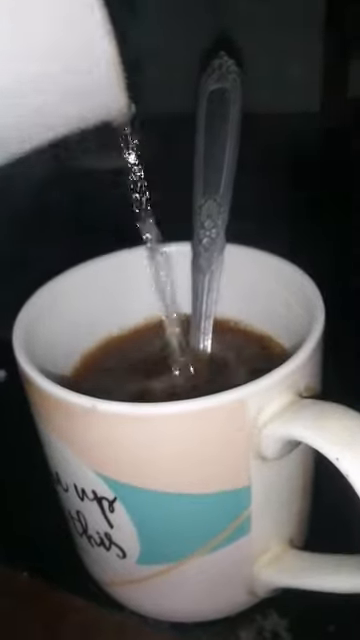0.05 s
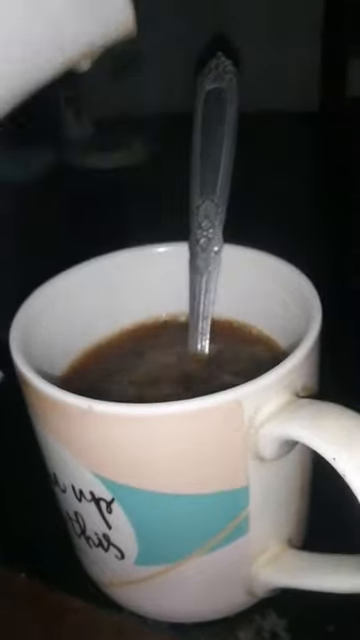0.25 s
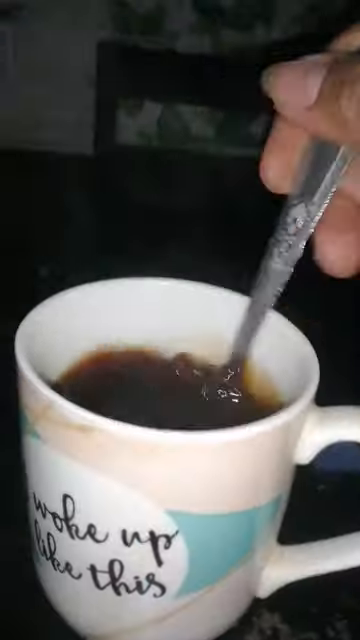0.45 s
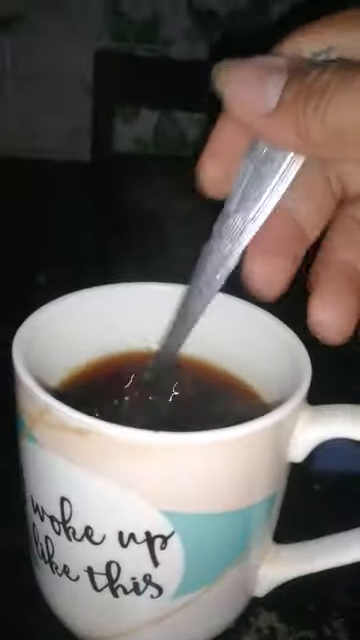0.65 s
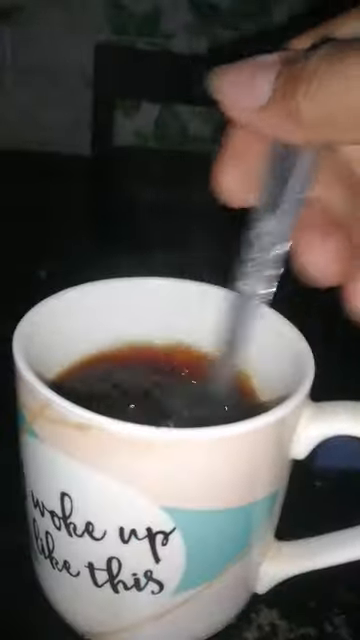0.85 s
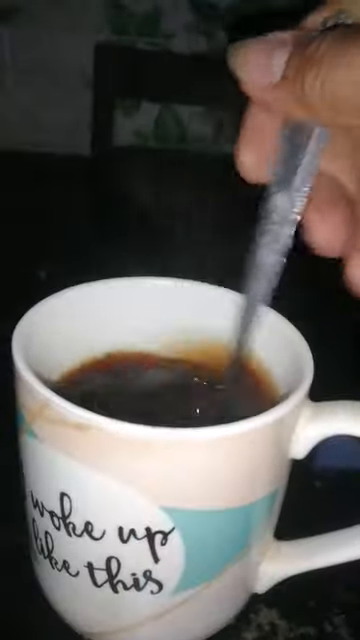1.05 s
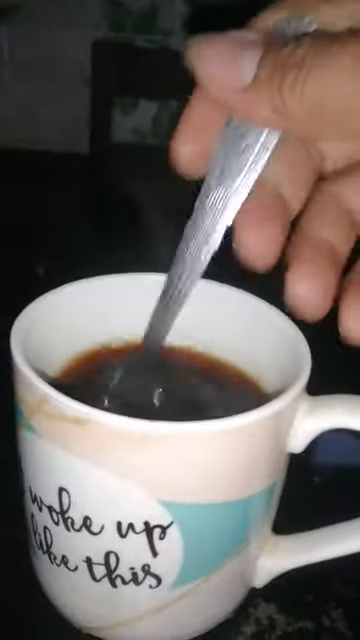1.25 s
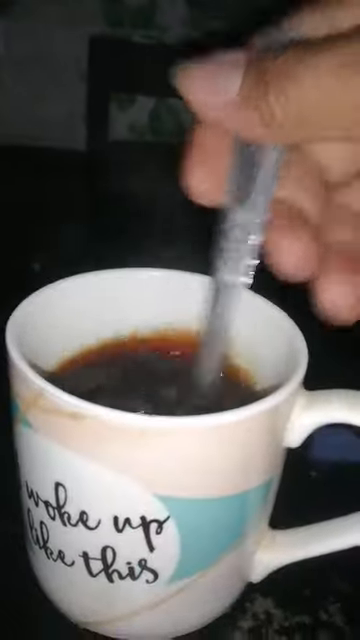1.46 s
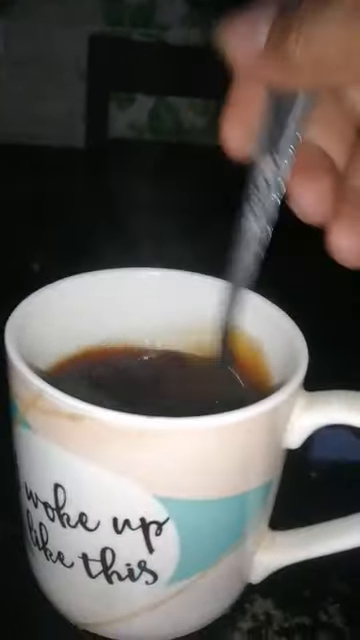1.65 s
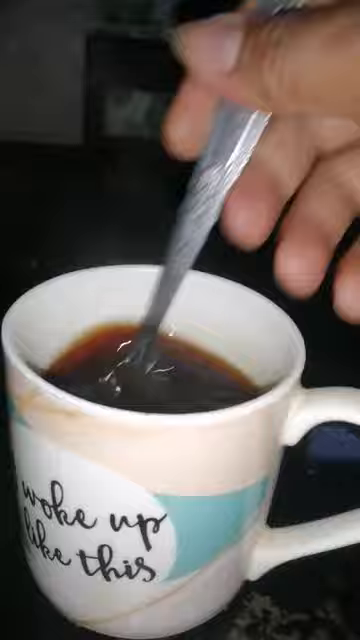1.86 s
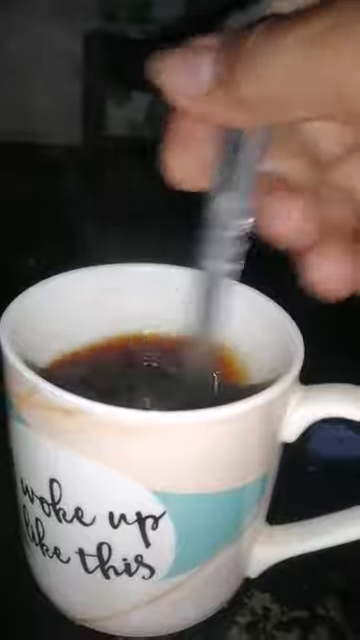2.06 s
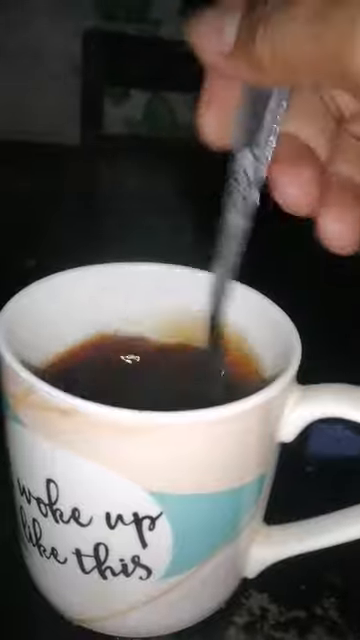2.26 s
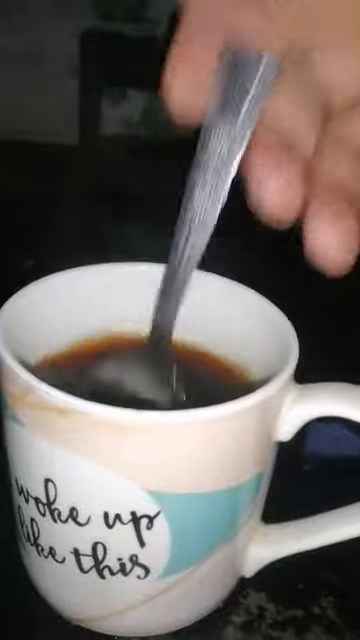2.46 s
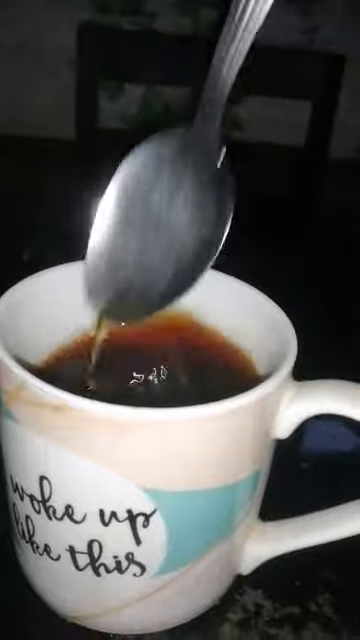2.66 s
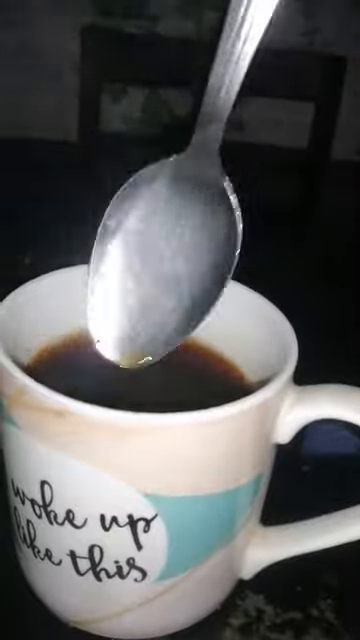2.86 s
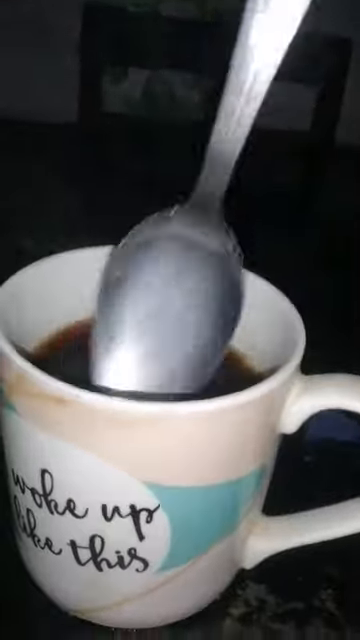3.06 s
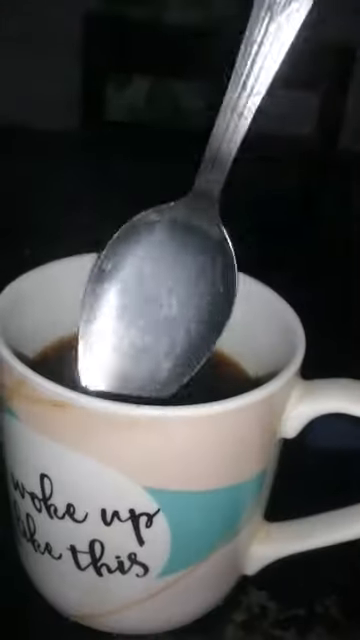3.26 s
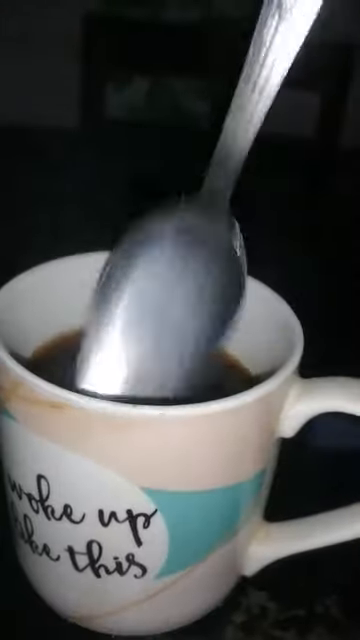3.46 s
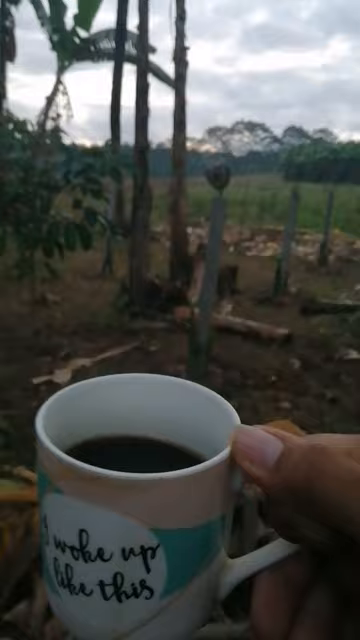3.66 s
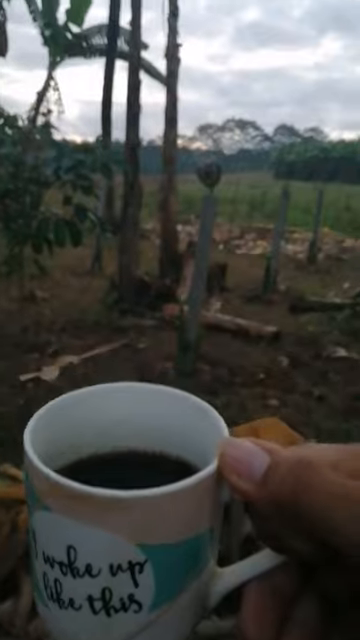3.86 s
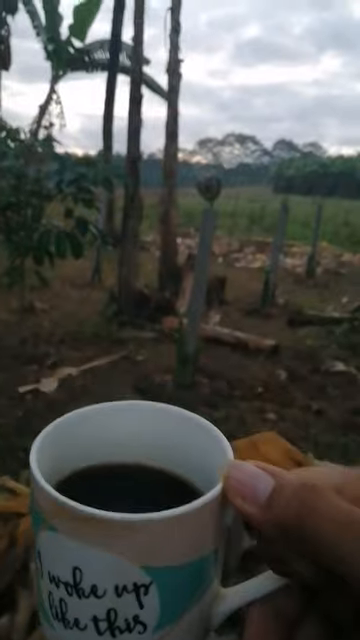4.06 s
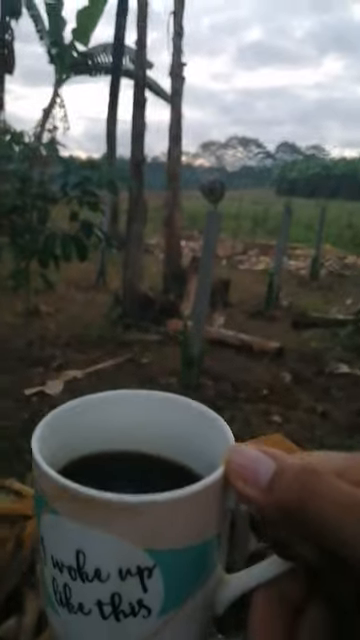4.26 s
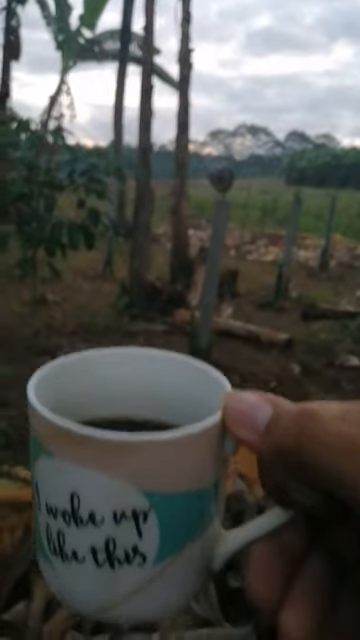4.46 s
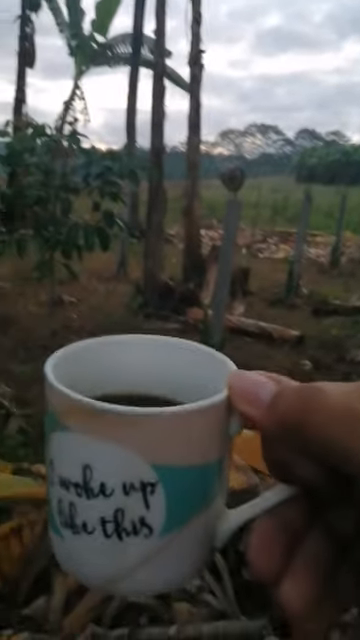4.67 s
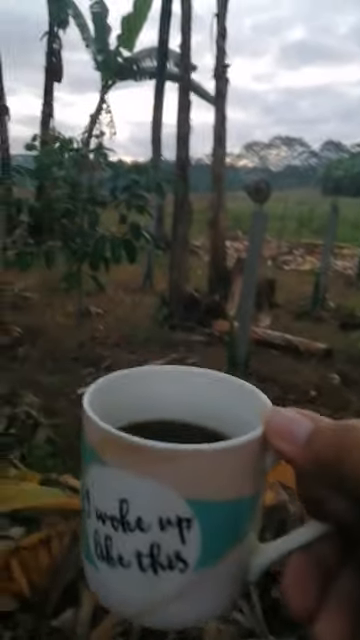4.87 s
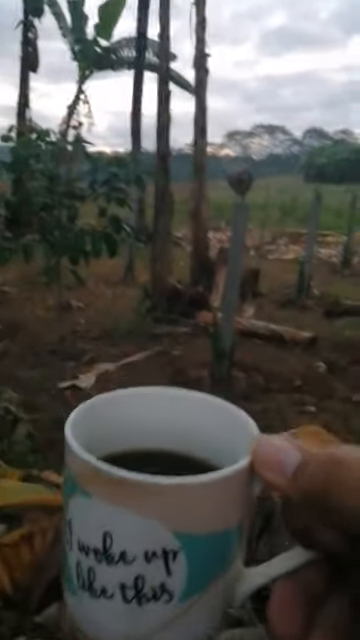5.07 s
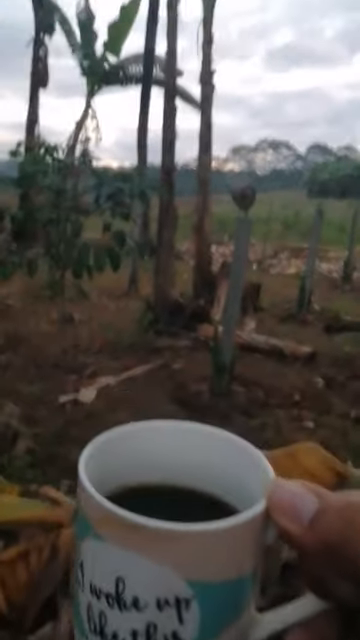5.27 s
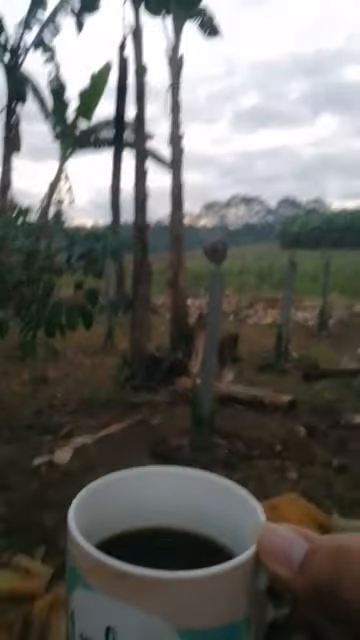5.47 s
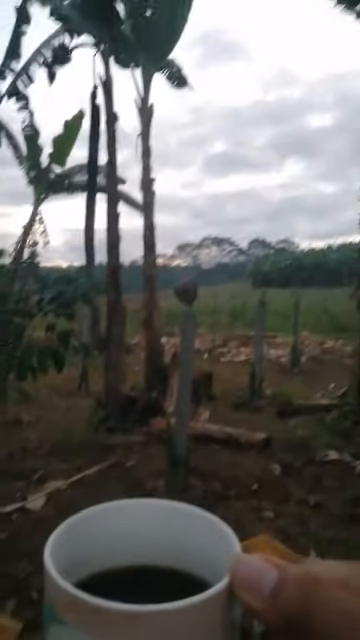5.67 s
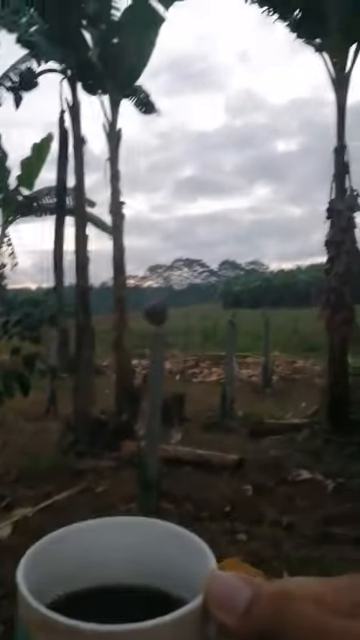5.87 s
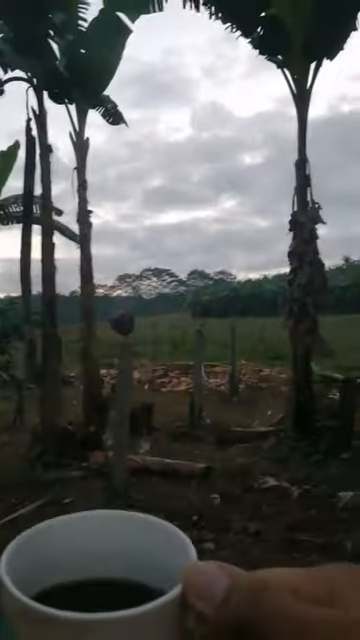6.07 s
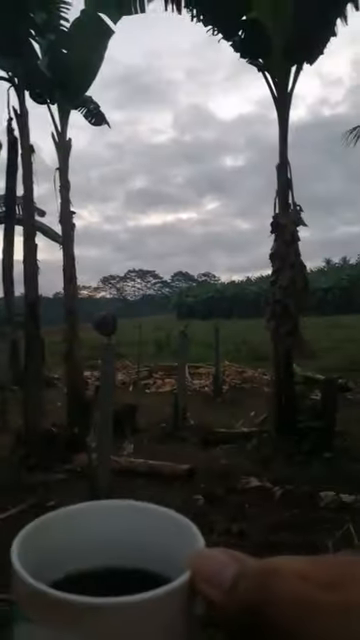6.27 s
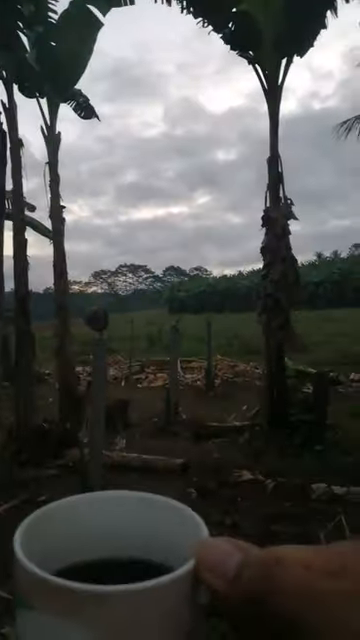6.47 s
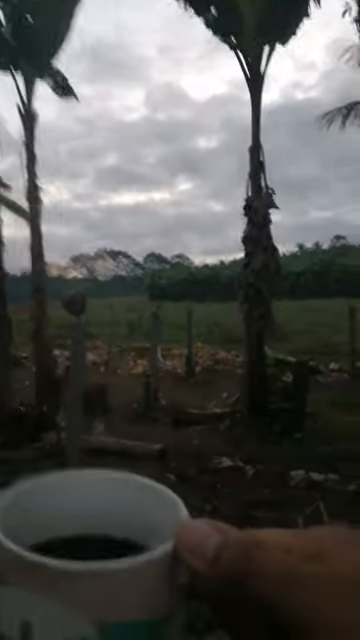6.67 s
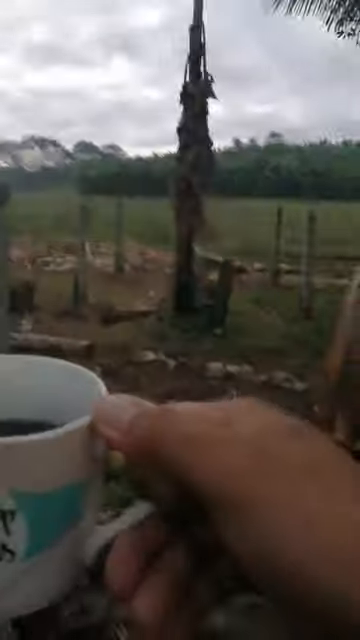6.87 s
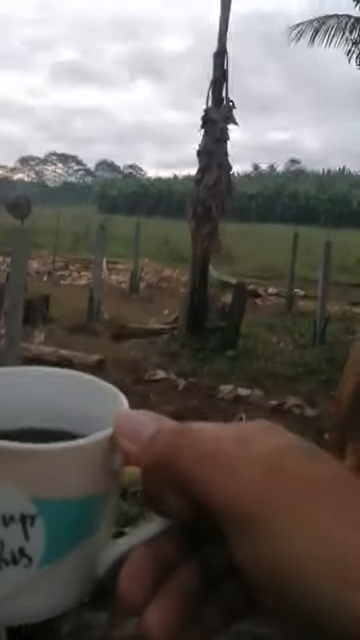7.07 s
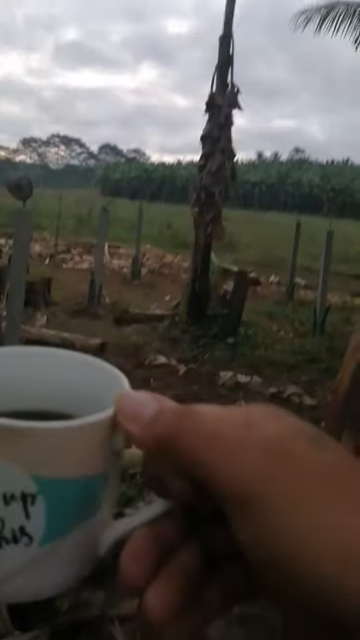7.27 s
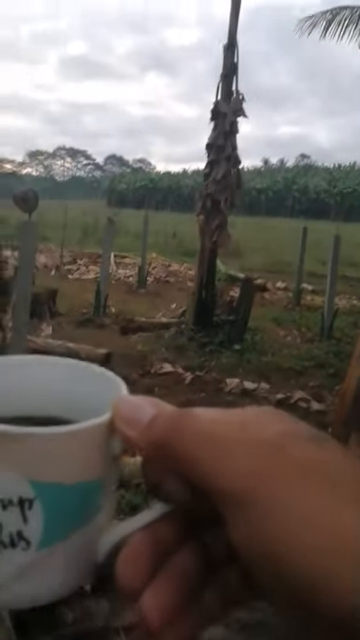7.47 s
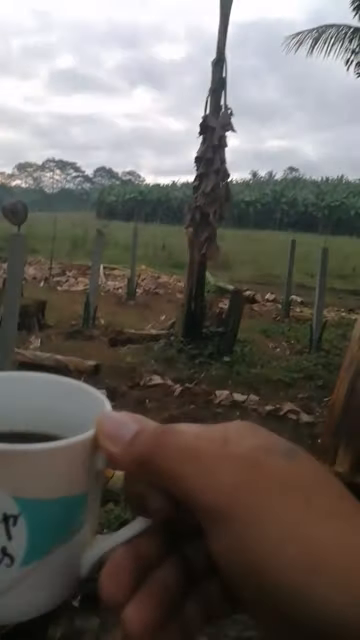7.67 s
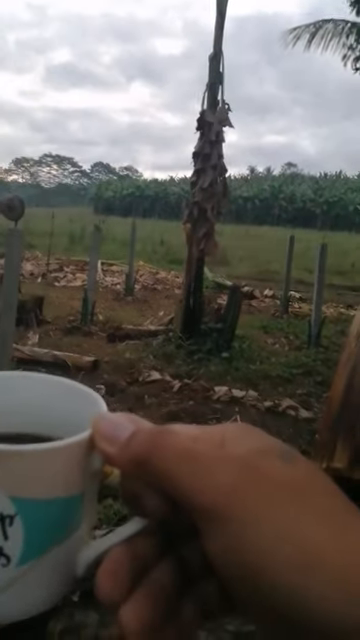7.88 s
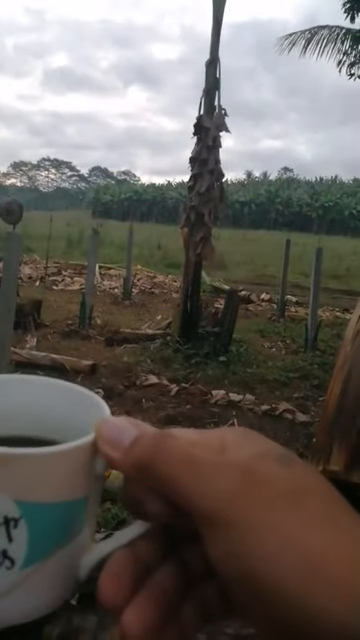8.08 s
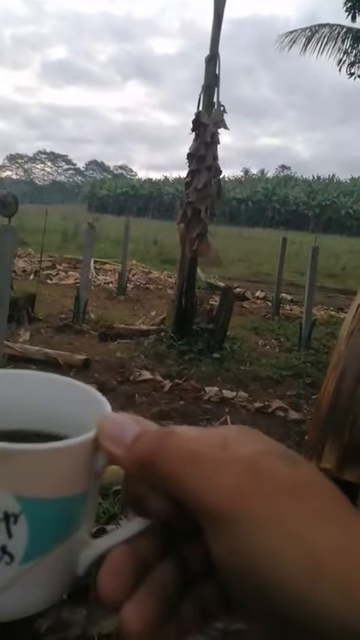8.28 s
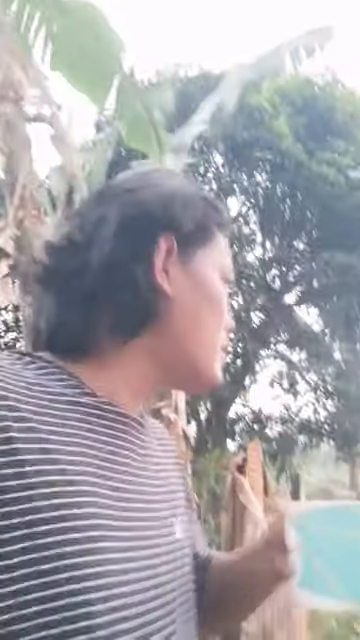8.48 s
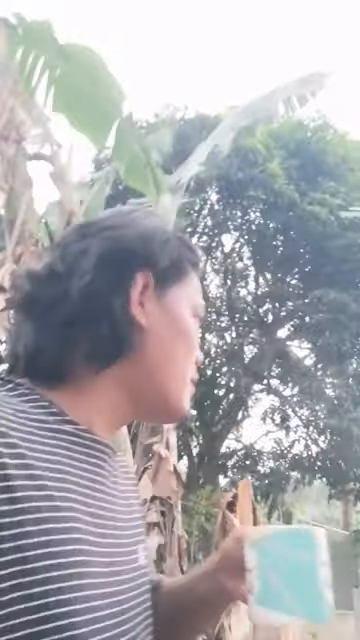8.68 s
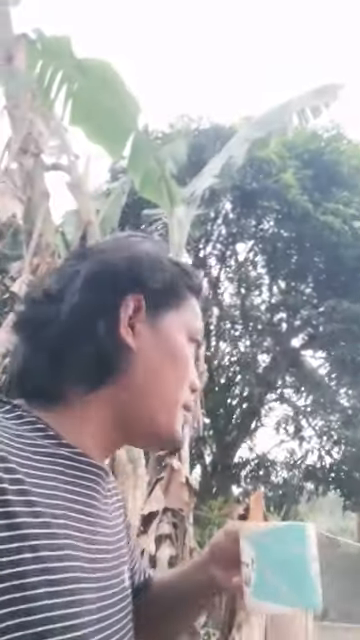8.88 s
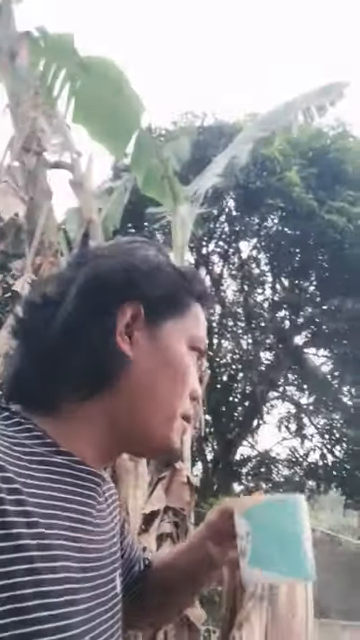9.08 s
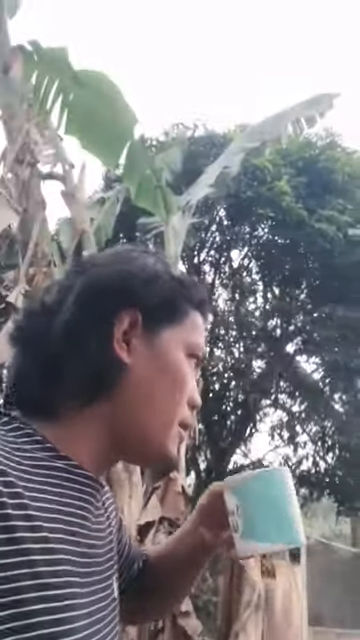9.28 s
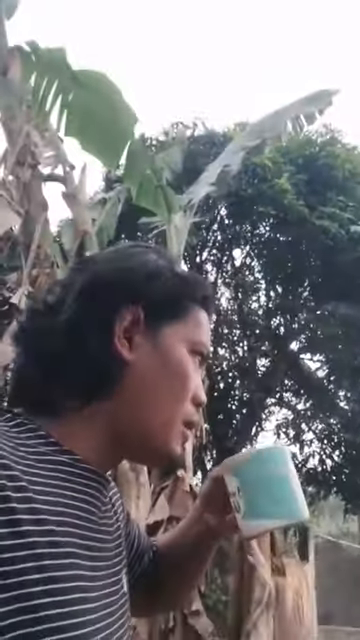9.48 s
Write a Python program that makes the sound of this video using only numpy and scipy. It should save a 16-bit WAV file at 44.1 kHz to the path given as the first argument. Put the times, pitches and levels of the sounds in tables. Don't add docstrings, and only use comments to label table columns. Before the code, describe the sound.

From 0 to 0.45 s, a few faint bubbly drops fall into a mug over quiet room air, a low motor hum and a thin pulsing cricket. A cut at 0.47 s starts close spoon stirring: light touches, then irregular damped ceramic clinks with small rebounds and gritty scrapes, busiest from 0.75 to 2.3 s, with a faint last touch near 2.6 s. Three loud, hard, bright rim raps follow at 2.9, 3.1 and 3.45 s, ringing briefly in the small room. At 3.7 s it cuts to open fields: steady high insect hiss, soft handling bumps, leaves gusting around 5.0-5.5 s, a sharp close tick at 5.6 s, extremely faint distant fowl, and a rooster from about 8.0 s. At 8.5 s another cut brings a small puttering engine, swelling until 9.6 s, while a field cricket gives triple chirps about every quarter second.

```python
import sys
import numpy as np
from scipy import signal
from scipy.fft import rfft, irfft, next_fast_len
from scipy.io import wavfile
from scipy.ndimage import uniform_filter1d

SR = 44100
rng = np.random.default_rng(int(sys.argv[2]) if len(sys.argv) > 2 else 0)


def transcribe(signal):
    frames = np.atleast_2d(signal).T
    limited = np.clip(frames, -1, 1)
    pcm = np.round(limited * 32767).astype(np.int16)
    wavfile.write(sys.argv[1], SR, pcm)


def magnitude_from_level(level_db):
    exponent = np.asarray(level_db, float) / 20
    return 10 ** exponent


N = 420713
T = np.arange(N) / SR

# (start [s], end [s])
SHOTS = [
    (0, .441),
    (.468, 3.668),
    (3.697, 8.451),
    (8.479, 9.6),
]
# (frequency [Hz], level [dB], t60 [s])
WET_MODES = [(308, -30, 0.071), (776.6, -21.5, 0.063), (1376, 0.5, 0.046), (1750, 2.5, 0.024),
             (1937, -1.5, 0.15), (2067, 3.5, 0.071), (2250, 1.5, 0.034), (2430, 4.5, 0.085),
             (2903, -21.5, 0.11), (965, -17.5, 0.0096), (574, -24.5, 0.024), (3400, -19, 0.056),
             (3870, -12, 0.041), (4220, -10.5, 0.035), (4980, -12, 0.044), (5460, -6.5, 0.038),
             (5460, -13, 0.033), (5770, -3, 0.023), (7030, -15.5, 0.051), (8040, -18, 0.037),
             (11050, -24.5, 0.059)]


def colour(x, table):
    hz, db = np.transpose(table)
    size = next_fast_len(x.shape[-1])
    f = np.maximum(np.arange(size // 2 + 1) * SR / size, 1)
    gain = magnitude_from_level(np.interp(np.log(f), np.log(hz), db))
    return irfft(rfft(x, size) * gain, size)[..., :x.shape[-1]]


def level(x, db):
    return x * magnitude_from_level(db) / np.sqrt(np.mean(x ** 2))


def walk(rate, size):
    k = int(SR / rate)
    held = np.repeat(rng.standard_normal(size // k + 1), k)
    return 1.85 * uniform_filter1d(uniform_filter1d(held, k), k)[:size]


def add(out, s, x):
    i = max(int(s * SR), 0)
    out[..., i:i + x.shape[-1]] += x[..., :max(N - i, 0)]


def sides(pan_db):
    return magnitude_from_level(np.array([[pan_db], [-pan_db]]) / 2)


def spoon_in_mug():
    out = rubbing() + stirring() + rapping()
    t = np.arange(int(.3 * SR)) / SR
    decay = np.exp(-np.log(1000) * t / 0.25) * (t > .006)
    tail = colour(rng.standard_normal((2, len(t))) * decay,
                  [(100, 10.0), (400, 7.0), (1200, 3.0), (3200, 2.0), (5500, -6.0), (9000, -4.0),
                   (11600, -4.5), (12300, -14), (13300, -6.5), (15000, -7.5)])
    return out + signal.fftconvolve(out, magnitude_from_level(-42.5) * tail, axes=1)[:, :N]


def stirring():
    # (time [s], peak level [dB], wall ring [dB], brightness [dB], wall note [Hz])
    blows = [(0.4848, -38.5, 2.5, -16.5, 2110), (0.607, -32.5, -16, -30, 2060),
             (0.6598, -27, -18, -13, 2025), (0.753, -14, -4.5, -11, 1917), (0.803, -16, -10, -17.5, 2090),
             (0.9975, -33, -5, -12, 2300), (1.036, -19.5, -3, -17.5, 1997), (1.1774, -14, -16, -13, 2180),
             (1.3422, -22, -9.5, -17.5, 2066), (1.491, -18.5, -10.5, -6, 2120),
             (1.6446, -16.5, -2, -14, 1860), (1.6655, -12, -11, -15, 2020),
             (1.7576, -9, -18.5, -13.5, 2105), (1.8997, -23, -16.5, -13.5, 2420),
             (1.9868, -11.5, -8.5, -17, 2094), (2.0585, -9, -21, -9, 2160),
             (2.2255, -21.5, -7.5, -13.5, 2250), (2.6231, -41.5, -8, -8, 2400)]
    blow_free = [0.76, 0.92, 1.2, 0.97, 1.06, 1.1, 0.8, 1, 1, .9, .9, 1.08, 1.35, 1.5, 1.4, 1.12, 0.92, 1]
    # (time [s], peak level [dB], wall ring [dB])
    rebounds = [(.5412, -52, -3), (.6414, -51, -15), (.8969, -40, -8), (1.186, -32.5, -1),
                (1.2157, -42.5, -25), (1.301, -45.5, -18), (1.583, -45, -9), (1.601, -44.5, -10),
                (2.1667, -49.5, -29), (2.3124, -50, -23), (0.7797, -48, 3), (1.066, -27.5, -1),
                (1.0752, -27.5, -2), (1.0854, -26, -3), (1.0924, -23, -3), (1.3642, -26.5, -23),
                (1.376, -22.5, -21), (1.3915, -21, -16), (1.5113, -27, -10), (1.6808, -26.5, -17),
                (1.765, -32.5, -14), (1.7845, -23.5, -37), (2.0674, -27, -3), (2.078, -26, -26),
                (2.2547, -35, -15), (2.229, -24.5, -16), (1.7705, -27, -17), (1.672, -27, -15),
                (.808, -24, -10)]
    out, wet = np.zeros((2, N)), np.array(WET_MODES) + [0, -13, 0]
    hits = [(*row, 3.5, .0013, free) for row, free in zip(blows, blow_free)]
    for s, db, ring_db in rebounds:
        note_hz = [row[-1] for row in blows if row[0] < s][-1]
        hits.append((s, db, ring_db, -20, note_hz, 5, .0024, .9))
    for s, db, ring_db, bright_db, note_hz, pan_db, crack_s, free in sorted(hits):
        hit = clink(wet * [1, 1, free], ring_db + 6.0, bright_db + 9.0, note_hz, crack_s, bounce_s=0.0049,
                    bounce_db=-12.5, scatter_db=2.2, rough_db=4.0, rise_s=0.0012, size=5000)
        add(out, s, magnitude_from_level(db + 3.5) * sides(pan_db) * hit)
    return out


def rapping():
    # (time [s], peak level [dB], wall ring [dB], brightness [dB], low thud [dB])
    raps = [
        (2.9251, 2, -22.5, -8, 0.5),
        (3.0747, -2, -33, -11.5, -0.5),
        (3.46, -1, -19.5, -9, 0.5),
    ]
    # (frequency [Hz], level [dB], t60 [s])
    rim_modes = [(640, -21, .05), (760, -22, .07), (1942, -8, .1), (2000, -13, .1), (2088, -1, .2),
                 (4247, -21, .13), (4520, -8, .035), (4830, -9, .05), (5160, -25, .12), (5464, -21, .16),
                 (5620, -25, .12), (5768, -23, .16), (5860, -23, .15), (6920, -25, .07)]
    # (frequency [Hz], level [dB], t60 [s])
    spoon_modes = [(7311, -29, .11), (7900, -27, .16), (8300, -28, .13), (9300, -29, .14), (9890, -27, .17),
                   (10310, -29, .11), (11425, -6, .135), (13090, -31, .13), (13320, -28, .16),
                   (13440, -30, .13), (13880, -35, .15), (14480, -24, .13), (14800, -31, .14),
                   (15120, -35, .13)]
    bowl_ring = [-5.5, 5, -6]
    grip_tuning = [.9965, .9995, 1.0015]
    rap_free = [1.05, .9, 0.92]
    out, rim = np.zeros((2, N)), np.array(rim_modes + spoon_modes) + [0, -9, 0]
    bowl = np.outer(np.abs(rim[:, 0] - 11400) < 300, [0, 1, 0])
    for row, sing_db, tuning, free in zip(raps, bowl_ring, grip_tuning, rap_free):
        s, db, ring_db, bright_db, thud_db = row
        modes = (rim + sing_db * bowl) * [tuning, 1, free]
        rap = clink(modes, ring_db + 10.0, bright_db + 10, 2089, crack_s=0.0023, bounce_s=.0033,
                    bounce_db=-2.1, scatter_db=1.5, rough_db=2.6, rise_s=0.00068, size=12000,
                    thud_db=thud_db)
        add(out, s, magnitude_from_level(db + 4.0) * sides(4.4) * rap)
    return out


def rubbing():
    # (from [s], to [s], level [dB], wall note [Hz])
    strokes = [(0.486, 0.53, -53.5, 2160), (0.521, 0.57, -50.5, 1420), (0.572, 0.63, -58.5, 1620),
               (0.535, 0.63, -62, 2090), (0.663, 0.72, -59, 1710), (2.61, 2.65, -62, 2320),
               (0.612, 0.717, -75, 1800), (0.76, 0.829, -41, 1900), (0.996, 1.029, -59.5, 2270),
               (1.042, 1.111, -41, 2010), (1.176, 1.227, -51.5, 2070), (1.353, 1.408, -40.5, 1880),
               (1.502, 1.537, -50.5, 2200), (1.642, 1.715, -45, 1380), (1.759, 1.811, -42.5, 2154),
               (1.895, 1.959, -47.5, 2250), (1.988, 2.041, -46, 2080), (2.06, 2.124, -46.5, 2170),
               (2.229, 2.279, -54, 1750)]
    # (frequency [Hz], density [dB per Hz])
    grit = [(200, -10), (900, -10), (1500, -1.5), (2100, 3.5), (3000, -2.5), (4400, -5.5), (5500, -4),
            (8000, -11.5), (14000, -22)]
    out, wet = np.zeros((2, N)), np.array(WET_MODES) + [0, -13, 0]
    for start, end, db, note_hz in strokes:
        span = end - start
        chance = rng.random((60, 2))
        slips = np.zeros((1, int(span * SR) + 1))
        slip_db = db - 2.2 * np.log(chance[:, 1]) - 6 * chance[:, 0]
        slips[0, (span * chance[:, 0] * SR).astype(int)] = magnitude_from_level(slip_db)
        body = clink(wet, 1.5, -2.0, note_hz, crack_s=0.00033, bounce_s=0.0056, bounce_db=-2.0,
                     scatter_db=1.0, rough_db=6.4, rise_s=0.0007, size=2600, thud_db=9.0)
        add(out, start, sides(-0.22) * signal.fftconvolve(slips, body, axes=1))
        t = np.arange(int((span + .12) * SR)) / SR
        note = [(note_hz / 1.1, 0), (note_hz, 14), (note_hz * 1.1, 0)]
        rub = level(colour(colour(rng.standard_normal((2, len(t))), grit), note), db - 2)
        rub = rub * magnitude_from_level(3.0 * walk(150, len(t)))
        fade = np.exp(-np.maximum(t - 0.41 * span, 0) / 0.047)
        add(out, start, rub * np.minimum(t / 0.014, 1) * fade)
    return out


def clink(modes, ring_db, bright_db, note_hz, crack_s, bounce_s, bounce_db, scatter_db, rough_db, rise_s,
          size, thud_db=0):
    # (frequency [Hz], density [dB per Hz])
    contact = [(35, -54.5), (60, -15), (1110, -17.5), (2140, -9.5), (3420, -21), (4740, 3), (6420, -6.5),
               (7740, -1.5), (10500, -7), (11300, -5.5), (11900, -10.5), (12400, -20.5), (13300, -7.5),
               (14900, -10.5), (16000, -42)]
    t = np.arange(size) / SR
    hz, db, t60 = np.transpose(modes)[:, :, None]
    wall, low = (hz > 1200) & (hz < 2700), hz < 1200
    off_note_db = np.minimum(np.abs(hz - note_hz) / 14, 17)
    db = db + wall * (ring_db - off_note_db) + thud_db * low
    db = db + bright_db * np.clip((hz - 6000) / 4000, 0, 1)
    hz = hz * (1 + .001 * rng.standard_normal(hz.shape))
    waver = walk(160, size * len(modes)).reshape(-1, size) * np.where(wall, .35, 1)
    decay = np.log(1000) * t / np.clip(t60, .02, .3)
    ringing = np.exp(2j * np.pi * hz * t - decay) * magnitude_from_level(db + rough_db * waver)

    ports = magnitude_from_level(scatter_db * rng.standard_normal((2, len(modes))))
    ports = ports * sides(-9.5) ** wall.T * sides(-1) ** low.T
    phase = rng.random((2, len(modes)))
    phase[1] = phase[0] + .25 + np.where(wall[:, 0], 0, .3 * (phase[1] - .5))
    ports = ports * np.exp(2j * np.pi * phase)

    short = t[:2048]
    echo = (short > bounce_s) * np.exp(-np.abs(short - bounce_s) / crack_s)
    shape = np.exp(-short / crack_s) + magnitude_from_level(bounce_db) * echo
    shape = shape * (1 - np.exp(-short / 0.000069))
    tilt = [(f, d + (bright_db if f > 7500 else thud_db if f < 1200 else 0)) for f, d in contact]
    noise = rng.standard_normal((3, len(short)))
    shared = np.array([noise[0], np.roll(noise[0], -9)])
    crack = colour(shared + 1.04 * noise[1:], tilt) * shape
    out = (ports @ ringing).imag * (1 - np.exp(-t / rise_s))
    out[:, :len(short)] += crack / np.abs(crack).max()
    return out


def engine():
    # (time [s], firing rate [Hz], exhaust level [dB])
    approach = [
        (8.48, 56.62, -63),
        (8.62, 52, -59.5),
        (8.8, 56.73, -56.5),
        (8.944, 53.2, -52),
        (9.094, 55.4, -52),
        (9.284, 53.96, -48),
        (9.54, 54.55, -45.5),
    ]
    # (multiple of the firing rate, level [dB])
    exhaust = [(1, -9.5), (2, 0.5), (3, -0.5), (4, -2), (5, -10), (6, -14), (7, -27), (8, -23.5), (9, -23),
               (10, -21.5), (11, -22)]
    s, hz, pipe_db = np.transpose(approach)
    rattle_db = -56.5 + 1.47 * (pipe_db - pipe_db[-1])
    t, out = T[T > s[0]], np.zeros((2, N))
    turns = np.cumsum(np.interp(t, s, hz) * (1 + .008 * walk(25, len(t)))) / SR
    pipe = 0
    for k, db in exhaust:
        strength = magnitude_from_level(db + 1.4 * walk(8.1, len(t)))
        pipe = pipe + strength * np.sin(2 * np.pi * (k * turns + rng.random()))
    rattle = colour(rng.standard_normal((2, len(t))),
                    [(200, -27.5), (450, -1.0), (1100, -3.0), (2500, -8.5), (4000, -20.5)])
    rattle = rattle * (.8 + np.exp(-(turns % 1) / .3))
    add(out, s[0], level(pipe, 0) * magnitude_from_level(np.interp(t, s, pipe_db)))
    add(out, s[0], level(rattle, 0) * magnitude_from_level(np.interp(t, s, rattle_db)))
    return out


def field_cricket():
    # (first stroke [s], peak level [dB])
    chirps = [
        (8.473, -44.5),
        (8.732, -40),
        (8.988, -40),
        (9.24, -41),
        (9.489, -43),
    ]
    out, t = np.zeros((2, N)), np.arange(int(0.03 * SR)) / SR
    stroke = np.sin(2 * np.pi * (5200 * t - 18000 * t ** 2)) * np.hanning(len(t))
    for s, db in chirps:
        for k in range(3):
            gain = magnitude_from_level(db - 5.0 + 2 * (k == 1)) * sides(0.58)
            add(out, s + 0.034 * k - .004, gain * stroke)
    return out


def house_cricket():
    # (first chirp [s], end [s], period [s], level [dB])
    spells = [
        (-.008, 0.47, 0.12, -57.5),
        (0.48, 3.68, .138, -54.5),
        (3.72, 9.3, 0.12, -63.5),
    ]
    out, early = np.zeros((2, N)), T[T < SHOTS[2][1]]
    rasp = colour(rng.standard_normal((2, len(early))),
                  [(5900, -34.5), (6350, -8.5), (6600, -3.5), (6800, -12.5), (7100, -40.0)])
    rasp = level(rasp, 0)
    for start, end, period, db in spells:
        since = (early - start) % period
        swell = since / 0.02 * np.exp(1 - since / 0.021)
        swell = swell * (1 + 0.29 * np.sin(2 * np.pi * 40 * since))
        add(out, 0, magnitude_from_level(db) * rasp * swell * (early > start) * (early < end))
    return out


def drops():
    # (time [s], peak level [dB], bubble pitch [Hz])
    falls = [(0.0074, -38.5, 7400), (0.0184, -47, 6260), (0.0234, -46, 4870), (0.0493, -43.5, 7300),
             (0.0564, -44, 1300), (0.119, -44, 9000), (.06, -44, 540), (0.0199, -40.5, 720),
             (0.049, -39.0, 750)]
    out, t = np.zeros((2, N)), np.arange(1300) / SR
    for s, db, hz in falls:
        bubble = np.sin(2 * np.pi * hz * t * (1 + 8 * t)) * np.exp(-t / 0.0021)
        splash = 0.96 * rng.standard_normal((2, len(t))) * np.exp(-t / 0.0016)
        add(out, s, magnitude_from_level(db - 2.5) * (bubble + splash))
    return out


def handling():
    # (time [s], peak level [dB], centre [Hz])
    knocks = [
        (.472, -42, 320),
        (3.226, -45.5, 560),
        (3.704, -50, 304),
        (4.091, -53, 1120),
        (4.852, -48, 545),
        (4.912, -51.5, 334),
        (5.087, -56, 275),
        (6.869, -52, 1700),
    ]
    # (time [s], peak level [dB])
    ticks = [
        (5.635, -15),
    ]
    # (frequency [Hz], density [dB per Hz])
    tick_colour = [(1000, -60), (2000, -33), (2800, -13), (4000, -7), (5440, -9), (7020, -7), (8540, -8),
                   (11500, -22), (16000, -34.5)]
    out, t = np.zeros((2, N)), np.arange(1300) / SR
    for s, db, hz in knocks:
        dull = [(hz / 3, -12), (hz, 0), (hz * 4, -10), (hz * 12, -32)]
        thud = colour(rng.standard_normal(len(t)), dull) * np.exp(-t / 0.0031)
        add(out, s, magnitude_from_level(db) * thud / np.abs(thud).max())
    for s, db in ticks:
        burst = rng.standard_normal((2, len(t))) * np.exp(-np.abs(t - .002) / 0.00022)
        tick = colour(burst, tick_colour)
        add(out, s - .0015, magnitude_from_level(db + 2.5) * sides(-5.5) * tick / np.abs(tick).max())
    return out


def partial(s, hz, db, hoarse):
    t = np.arange(s[0], s[-1], 1 / SR)
    fade = np.clip(np.minimum(t - s[0], s[-1] - t) / .02, 0, 1)
    flutter = np.sqrt(1 - hoarse) + np.sqrt(hoarse) * walk(260, len(t))
    waver = 1 + .03 * hoarse * walk(60, len(t))
    tone = np.sin(2 * np.pi * np.cumsum(np.interp(t, s, hz) * waver) / SR)
    return np.sqrt(2) * magnitude_from_level(np.interp(t, s, db)) * flutter * fade * tone


def fowl():
    # (from [s], to [s], from pitch [Hz], to pitch [Hz], level [dB])
    cries = [(0.925, 1.007, 3770, 3740, -63), (2.39, 2.573, 4080, 4040, -63.5),
             (2.407, 2.554, 330, 313, -59), (4.582, 4.764, 915, 905, -71),
             (4.986, 5.618, 1655, 1560, -73.5), (5.898, 6.105, 1128, 1190, -74),
             (6.083, 6.354, 1197, 1210, -71), (6.106, 6.25, 1308, 1300, -70.5),
             (6.68, 6.9, 1530, 1610, -76), (8.36, 8.452, 1860, 1910, -70), (5.89, 6.244, 1543, 1582, -81),
             (6.3, 6.602, 980, 965, -76), (6.949, 7.6, 922, 852, -77), (6.194, 6.701, 1960, 1884, -80.5),
             (6.998, 7.603, 1830, 1770, -78.5), (7.871, 7.959, 1177, 994, -66),
             (7.86, 7.93, 1850, 1746, -72), (8.209, 8.463, 1025, 937, -69)]
    # (time [s], fundamental [Hz])
    crow = [
        (8.041, 436),
        (8.26, 508),
        (8.45, 478),
    ]
    out = np.zeros((2, N))
    for start, end, hz, to_hz, db in cries:
        hoarse = .08 if hz > 3000 else .22
        add(out, start, partial([start, end], [hz, to_hz], [db - 5, db - 5], hoarse))
    s, hz = np.transpose(crow)
    for k, db in [(3, -78.5), (4, -77.5)]:
        add(out, s[0], partial(s, k * hz, db + 0 * s, .25))
    return out


def hums():
    # (from [s], to [s], frequency [Hz], level [dB])
    steady_hums = [
        (0.469, 0.717, 61.4, -62.5),
        (1.502, 3.711, 127.6, -65.5),
    ]
    # (multiple of its firing rate, level [dB])
    motor = [(1, -84), (2, -56.5), (3, -88), (4, -79), (5, -70), (6, -72), (7, -67), (8, -74), (10, -81)]
    out, motor_hz = np.zeros((2, N)), 39
    for start, end, hz, db in steady_hums:
        add(out, start, partial([start, end], [hz, hz], [db, db], .03))
    for k, db in motor:
        add(out, 0, partial([-.02, .46], [k * motor_hz] * 2, [db, db], .03))
    return out


def leaves():
    # (from [s], to [s], level [dB])
    gusts = [
        (5.015, 5.46, -62.5),
        (5.813, 5.999, -70),
        (6.118, 6.26, -69),
        (8.145, 8.34, -68.5),
    ]
    breeze = magnitude_from_level(-82.5)
    for start, end, db in gusts:
        outside = np.maximum(0, np.maximum(start - T, T - end))
        breeze = breeze + magnitude_from_level(db - 70.5 * outside)
    rustle = colour(rng.standard_normal((2, N)), [(300, -3.0), (500, -7.5), (1200, -5.0), (1600, 0.5),
                                                  (2500, -7.5), (3800, -3), (4500, -28.0)])
    outdoors = (T > SHOTS[2][0]) * (T < SHOTS[3][0])
    return level(rustle, -3.5) * breeze * magnitude_from_level(1.2 * walk(12, N)) * outdoors


def air(size, table, db, flicker_db, swell_db):
    # (frequency [Hz], likeness [0-1])
    likeness = [(60, 0.89), (130, 0.9), (290, 0.77), (640, 0.4), (1410, 0), (3100, 0), (6820, 0),
                (15000, 0.04)]
    like_hz, like = np.transpose(likeness)
    pad = next_fast_len(size)
    f = np.maximum(np.arange(pad // 2 + 1) * SR / pad, 1)
    alike = np.clip(np.interp(np.log(f), np.log(like_hz), like), 0, 1)
    mid, side = rfft(colour(rng.standard_normal((2, pad)), table))
    both = np.array([np.sqrt(1 + alike) * mid + sign * np.sqrt(1 - alike) * side for sign in (1, -1)])
    out, swell = 0, walk(1.0, size)
    for octave in range(6, 15, 2):
        share = np.clip(1 - np.abs(np.clip(np.log2(f), 6, 14) - octave) / 2, 0, 1)
        strength = magnitude_from_level(swell_db * swell + flicker_db * walk(60, size))
        out = out + irfft(both * share, pad)[:, :size] * strength
    return level(out, db)


def scene():
    # (frequency [Hz], density [dB per Hz])
    air_spectra = [
        [(15, -47), (25, -15), (76, 1), (108, -19), (270, -12), (795, -21.5), (910, -28), (2410, -33),
         (4050, -31.5), (4400, -16), (5720, -18), (6550, -27), (8130, -21.5), (16000, -33)],
        [(15, -42.5), (25, -5.5), (123, -6), (206, -3), (326, -10), (695, -21), (3810, -27), (4140, -26.5),
         (4490, -13.5), (6550, -15.5), (7700, -21.5), (12900, -31), (16000, -48.5)],
        [(15, -41), (25, -9), (217, -17.5), (451, -25), (910, -24), (1330, -30), (1840, -27), (2600, -30.5),
         (3810, -35), (4490, -6.5), (5280, -2), (5880, -6.5), (7100, -26.5), (8820, -9.5), (10400, -31),
         (16000, -30)],
        [(15, -43), (25, -16), (153, -6.5), (427, -19), (1160, -21.5), (1260, -19.5), (3240, -24.5),
         (3920, -22), (4490, -9.5), (5280, -5), (7300, -25), (8820, -11.5), (10400, -34), (14700, -33),
         (16000, -47.5)],
    ]
    air_db = [-59.5, -59, -52, -51.5]
    out = spoon_in_mug() + engine() + field_cricket() + house_cricket()
    out = out + drops() + handling() + fowl() + hums() + leaves()
    gate = np.zeros(N)
    for (start, end), table, db in zip(SHOTS, air_spectra, air_db):
        size = int((end - start + .02) * SR)
        add(out, start, air(size, table, db + 1.0, flicker_db=1.2, swell_db=.7))
        gate += (T >= start) * (T < end + .02) * magnitude_from_level(-3000 * np.clip(T - end, 0, 1))
    return out * gate


def roll_off(x):
    return signal.sosfilt(signal.butter(12, 16200, fs=SR, output="sos"), x)


def record(dry):
    # (frequency [Hz], left minus right [dB])
    port_colour = [(60, -4), (200, -4), (700, -3), (1300, -6.5), (2400, -5.5), (4400, -9), (5600, -16),
                   (6600, -12), (7600, 6), (15000, -5)]
    # (frequency [Hz], gain [dB])
    top_cut = [(15900, 0), (16150, -5), (16300, -50)]
    ports = []
    for x, sign in zip(dry, (1, -1)):
        ports.append(colour(x, [(hz, sign * db / 2) for hz, db in port_colour]))
    return roll_off(colour(np.clip(np.array(ports), -1, 1), top_cut))


dry = scene()
out = record(dry)
transcribe(out)
```